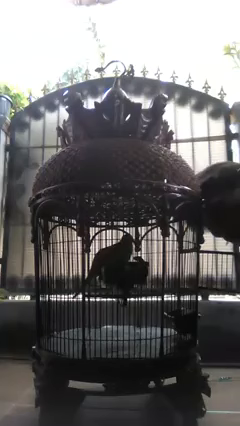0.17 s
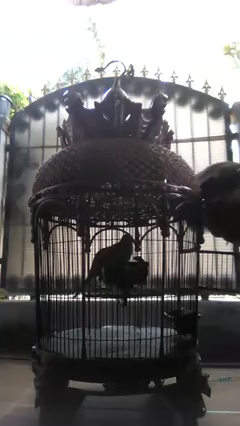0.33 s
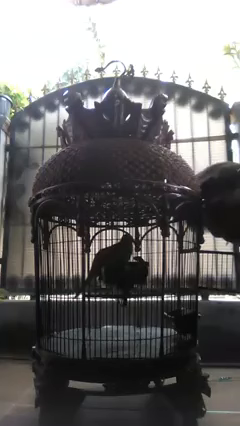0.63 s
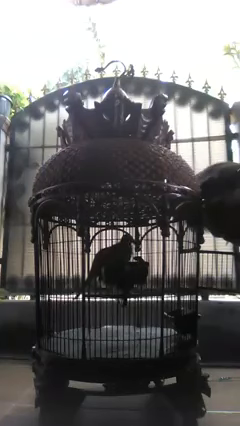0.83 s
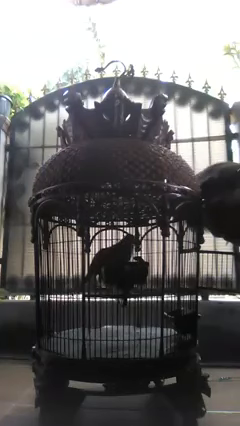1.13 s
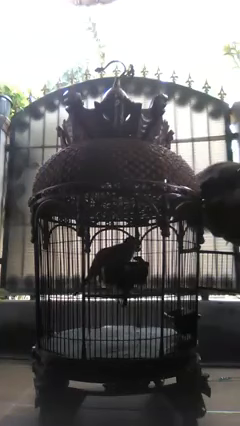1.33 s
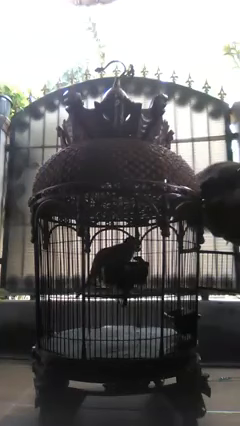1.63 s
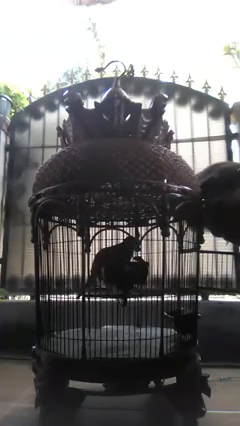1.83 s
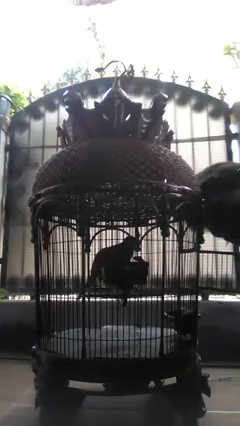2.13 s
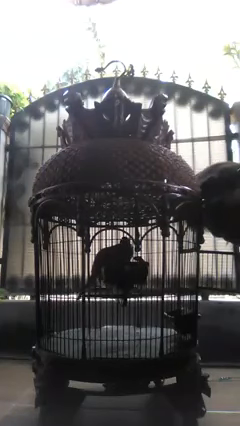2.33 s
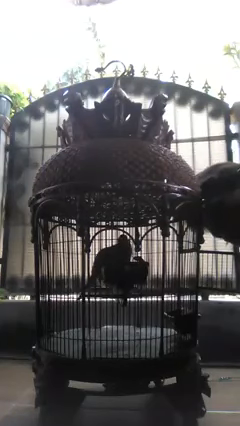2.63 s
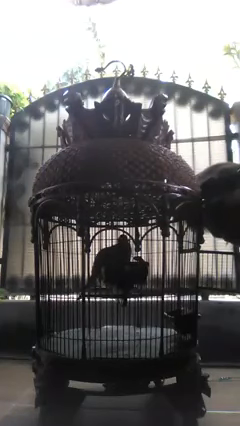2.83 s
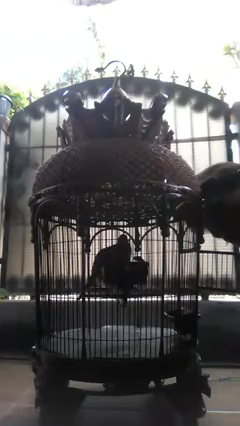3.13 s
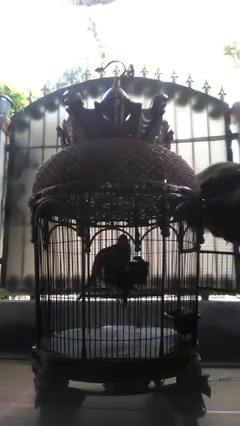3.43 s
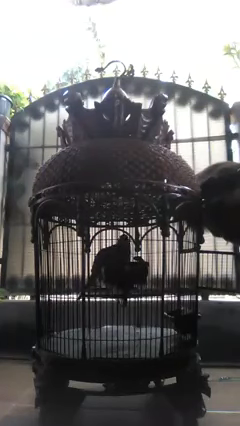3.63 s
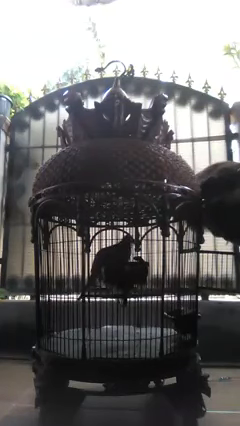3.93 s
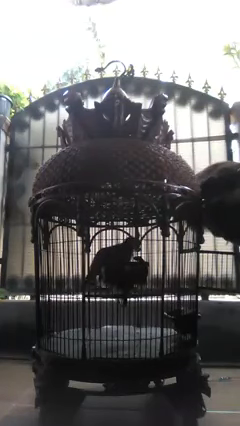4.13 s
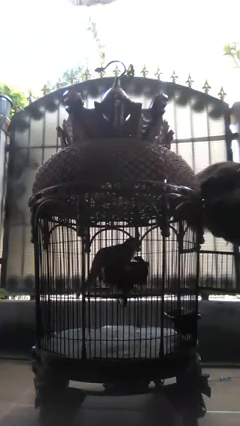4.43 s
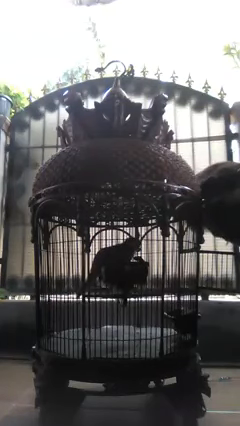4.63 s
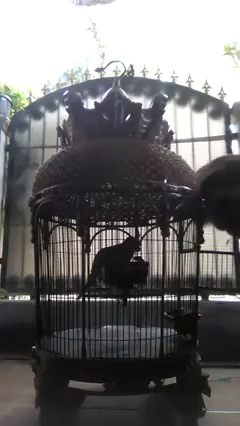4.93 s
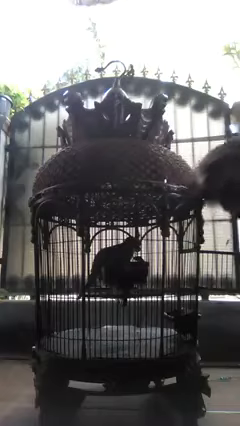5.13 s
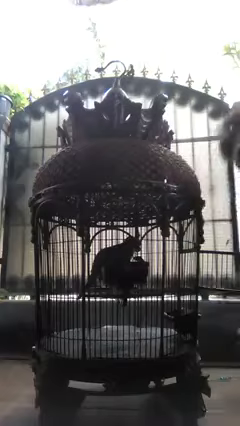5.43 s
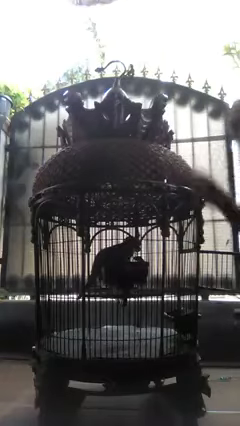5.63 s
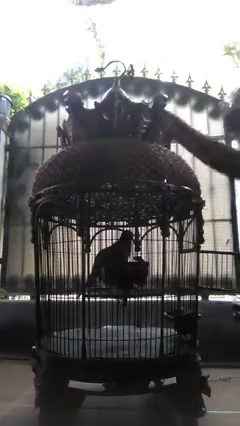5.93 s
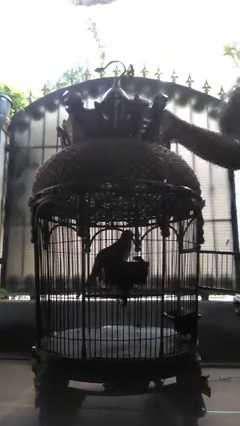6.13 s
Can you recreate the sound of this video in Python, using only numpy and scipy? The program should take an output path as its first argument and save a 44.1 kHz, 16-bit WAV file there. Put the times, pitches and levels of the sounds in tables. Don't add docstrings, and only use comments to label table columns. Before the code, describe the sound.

After over a second of quiet yard air, faint hollow taps and tiny chirps, a nearby caged dove clicks and rolls a fast run of scooped coos. A distant dove answers more softly. The caged dove repeats its phrase past four seconds, then a deeper, fainter dove replies while feet scrape lightly on grit. Walls echo everything; traffic rumbles low behind a phone-grade microphone with light hiss.

```python
import sys
import numpy as np
from scipy import signal
from scipy.fft import rfft, irfft, next_fast_len
from scipy.io import wavfile
from scipy.ndimage import uniform_filter1d, map_coordinates

SR = 44100
rng = np.random.default_rng(int(sys.argv[2]) if len(sys.argv) > 2 else 0)


def invert_db(level):
    return 10 ** (np.asarray(level, dtype=float) / 20)


def unload_wav(signal):
    wavfile.write(
        sys.argv[1],
        SR,
        np.round(np.clip(np.atleast_2d(signal).T, -1, 1) * 32767).astype(np.int16),
    )


N = 277168
T = np.arange(N) / SR


def along(points, hz):
    f, v = np.transpose(points)
    return np.interp(np.log(hz + 1), np.log(f + 1), v)


def wobble(knots_per_s):
    return map_coordinates(rng.standard_normal(int(N * knots_per_s / SR) + 4), [T * knots_per_s])


def coloured(points):
    m = next_fast_len(N)
    gain = invert_db(along(points, np.fft.rfftfreq(m, 1 / SR)))
    x = irfft(rfft(rng.standard_normal(m)) * gain, m)[:N]
    return x / np.std(x)


def add(track, s, sound):
    part = track[round(s * SR):][:len(sound)]
    part += sound[:len(part)]


# multiple of f0, level/dB
OVERTONES = [(1, -1.5), (2, -18.5), (3, -24), (4, -36), (5, -29.5), (6, -49), (7, -50)]
# f/Hz, level/dB
PUFF = [(400, -34.5), (1500, -12.5), (3000, -7), (3600, -6), (5000, -16.5), (6400, -8.5), (7000, -20),
        (9000, -27), (12000, -58)]


def dove(notes, crop, from_hz, bend, sag_share, drop_hz, bright_db, puff_db, push, push_late_s):
    muffle_db, scoop_db = 24, -7
    push_s, drop_s = 0.0034, 0.013
    out, air = np.zeros(N), np.zeros(N)
    for s, rise, length, top_hz, db in notes:
        t = np.arange(round((length + 0.019) * SR)) / SR
        scoop = np.clip(1 - t / max(rise, 1e-4), 0, 1) ** bend
        drop = np.clip((t - length) / drop_s, 0, 1)
        sag = np.clip((t - rise) / max(length - rise, 1e-3), 0, 1) ** 1.9
        hz = top_hz * (1 - sag_share * sag) - (top_hz - from_hz) * scoop - drop_hz * drop
        phase = 2 * np.pi * (np.cumsum(hz) / SR + rng.random())
        accent = 1 + push * np.exp(-((t - rise - push_late_s) / push_s) ** 2)
        buzz_db = bright_db - 18 * sag
        tone = np.zeros(len(t))
        for k, level in OVERTONES:
            partial_db = level + along(crop, k * hz)
            if k > 1:
                partial_db = partial_db + buzz_db
            if k > 2:
                partial_db = partial_db - muffle_db * scoop
            tone += invert_db(partial_db) * (accent if k == 1 else 1) * np.sin(k * phase)
        attack = np.clip(t / (.004 + 0.28 * rise), 0, 1)
        release = np.cos(np.pi / 2 * drop) ** 2
        add(out, s, invert_db(db + scoop_db * scoop) * attack * release * tone)
        add(air, s, invert_db(db + puff_db) * np.exp(-((t - 0.71 * rise) / 0.013) ** 2))
    return out + air * coloured(PUFF)


def scooped(notes):
    rise_s, rise_per_pause, longest_rise_s = .0165, .08, .04
    waits = np.diff([s for s, *_ in notes], prepend=0)
    return [(s, min(rise_s + rise_per_pause * wait, longest_rise_s), *rest)
            for (s, *rest), wait in zip(notes, waits)]


def with_rise(notes, rise_s):
    return [(s, rise_s, *rest) for s, *rest in notes]


# t/s, peak level/dB
BEAK = [
    (1.365, -44.5),
    (4.271, -45.5),
]


def beak():
    out, t = np.zeros(N), np.arange(SR // 10) / SR
    for s, db in BEAK:
        ring = np.sin(2 * np.pi * 1080 * t) * invert_db(-5.0 - 60 * t / 0.092)
        ring += np.sin(2 * np.pi * 1650 * t) * invert_db(-60 * t / 0.028)
        crack = uniform_filter1d(rng.standard_normal(len(t)), size=7)
        add(out, s, invert_db(db - 17.5) * (ring + invert_db(-2.5 - 60 * t / .012) * crack))
    return out


# t/s, length/s, top f/Hz, level/dB
CAGED = [(1.42, 0.071, 1210, -22), (1.494, 0.038, 1173, -23.5), (1.545, .06, 1196, -25.5),
         (1.61, .05, 1154, -23.5), (1.695, .07, 1165, -24.5), (1.806, .09, 1190, -24),
         (4.322, 0.045, 1235, -21), (4.394, 0.064, 1212, -24), (4.447, 0.059, 1205, -24.5),
         (4.517, 0.059, 1152, -24), (4.603, 0.044, 1177, -23.5), (4.723, 0.083, 1202, -22.5)]
# t/s, length/s, top f/Hz, level/dB
CLOSING = [
    (1.906, .04, 1158, -31),
    (1.95, 0.0044, 720, -43),
    (4.828, .04, 1142, -30),
    (4.865, 0.016, 675, -41),
]
# f/Hz, level/dB
CROP = [(300, -24), (600, -5), (900, -2.5), (1200, -2.5), (1700, 1), (2400, -10), (2900, -6), (3600, -2),
        (4200, 6.5), (4750, -2.5), (5300, -13), (6000, -1.5), (7000, -19)]


def caged_dove():
    coos = dove(scooped(CAGED), CROP, from_hz=420, bend=1.6, sag_share=.035, drop_hz=400,
                bright_db=0.1, puff_db=-33, push=2.2, push_late_s=0.0062)
    closing = dove(with_rise(CLOSING, .003), CROP, from_hz=360, bend=2.2, sag_share=.14, drop_hz=302,
                   bright_db=-6.5, puff_db=-36, push=3.0, push_late_s=0.026)
    return coos + closing + invert_db(15) * beak()


# t/s, rise/s, length/s, top f/Hz, level/dB
NEIGHBOUR = [
    (2.258, .037, 0.077, 1210, -36),
    (2.338, 0.0049, 0.033, 1209, -40),
    (2.383, 0.0035, .03, 1190, -40.5),
    (2.422, .02, 0.047, 1159, -41.5),
    (2.499, .02, .066, 1139, -45),
    (2.59, 0.02515, 0.074, 1159, -42),
    (2.738, .019, 0.06, 1193, -40),
    (2.825, 0.0059, 0.067, 1092, -54),
]
# f/Hz, level/dB
FAR_CROP = [(600, -58), (800, 5.5), (920, 4.5), (1050, 0), (1200, 0.5), (2400, -15.5), (6000, -36)]


def neighbour_dove():
    return dove(NEIGHBOUR, FAR_CROP, from_hz=880, bend=0.3175, sag_share=0.012, drop_hz=150,
                bright_db=-17, puff_db=-51.0, push=1.17, push_late_s=-.011)


# t/s, length/s, f/Hz, level/dB
DEEP = [(4.936, 0.047, 920, -44), (5.07, 0.048, 914, -57.5), (5.141, 0.016, 915, -47.5),
        (5.225, 0.029, 905, -43), (5.315, 0.0083, 900, -46), (5.341, 0.015, 900, -48),
        (5.383, 0.015, 905, -47), (5.424, 0.15, 900, -65), (6.074, 0.033, 905, -56.5),
        (6.129, 0.078, 945, -45.5), (6.204, 0.027, 950, -40.5), (6.242, 0.033, 945, -46)]


def deep_dove():
    return dove(with_rise(DEEP, 0.0073), FAR_CROP, from_hz=930, bend=1.06, sag_share=0.0083, drop_hz=60.4,
                bright_db=-19.0, puff_db=-53, push=0.23, push_late_s=0.007)


# t/s, level/dB
FALLING = [(0.701, -61.5), (1.24, -62.5), (2.067, -59.5), (2.531, -56.5), (3.368, -55), (3.828, -56),
           (4.68, -54.5), (5.158, -57), (6.058, -57)]
# t/s, level/dB
RISING = [
    (0.303, -64.5),
    (1.686, -58.5),
    (2.969, -57.5),
    (4.285, -56),
    (5.634, -55),
]
# t/s, from f/Hz, to f/Hz, level/dB
STRAY = [
    (3.34, 4115, 2560, -61),
    (3.802, 3870, 3470, -67),
]


def chirps():
    # length/s, from f/Hz, to f/Hz, curve (over 1 = slow at first)
    fall, rise = (.078, 4950, 3210, 1.25), (0.044, 3800, 5550, .85)
    stray_hz_per_s, waver_db = 18000, 1.2
    out, flutter = np.zeros((3, N)), wobble(300)
    calls = [(s, *fall, db) for s, db in FALLING]
    calls += [(s, *rise, db) for s, db in RISING]
    calls += [(s, (a - b) / stray_hz_per_s, a, b, 1, db) for s, a, b, db in STRAY]
    for k, (s, length, from_hz, to_hz, curve, db) in enumerate(calls):
        u = np.linspace(0, 1, round(length * SR))
        glide = u ** curve - .06 * np.sin(2 * np.pi * u)
        hz = from_hz + (to_hz * rng.normal(1, 0.017) - from_hz) * glide
        hz = hz + 85 * flutter[round(s * SR):][:len(u)]
        swell = np.sin(np.pi * u) ** 1.1
        add(out[k % len(out)], s, invert_db(db + 1.0) * swell * np.sin(2 * np.pi * np.cumsum(hz) / SR))
    return out * invert_db(waver_db * wobble(220))


# t/s, peak level/dB
TAPS = [(0.054, -53), (0.5715, -56.5), (1.0647, -53), (2.0655, -53), (2.58, -54.5), (3.0445, -55.5),
        (3.5681, -58), (4.055, -50.5), (5.5593, -52.5), (6.0786, -58.5)]
# f/Hz, level/dB, t60/s
HOLLOW = [
    (1678, -1, 0.062),
    (1920, 4.5, 0.027),
    (2050, -3, 0.057),
    (2157, -12, .05),
]


def taps():
    out, t = np.zeros(N), np.arange(SR // 4) / SR
    for s, db in TAPS:
        ring = np.zeros(len(t))
        for hz, level, t60 in HOLLOW:
            decay = invert_db(level + rng.normal(0, 0.37) - 60 * t / t60)
            ring += decay * np.sin(2 * np.pi * hz * rng.normal(1, 0.023) * t)
        add(out, s, invert_db(db - 10.5) * ring * (1 - np.exp(-t / .002)))
    return out


# t/s, f/Hz, level/dB
WHISTLE = [
    [(4.0, 2020, -75.5), (4.3, 2050, -83.5)],
    [(4.38, 1994, -61), (4.6, 2020, -60.5), (4.8, 2096, -60.5), (4.95, 2050, -59), (5.1, 2013, -59),
     (5.3, 2020, -74), (5.5, 2126, -74)],
    [(5.56, 2024, -58), (5.65, 1926, -60.5), (5.77, 1870, -72.5), (5.97, 1855, -80)],
]


def whistle():
    out = np.zeros(N)
    for rows in WHISTLE:
        s, hz, db = np.transpose(rows)
        edge = np.clip(np.minimum(T - s[0], s[-1] - T) / 0.028, 0, 1)
        phase = 2 * np.pi * np.cumsum(np.interp(T, s, hz) + 18 * wobble(40)) / SR
        out += edge * invert_db(np.interp(T, s, db) + 2.3 * wobble(45)) * np.sin(phase)
    return out


# t/s, fade t60/s, level/dB, low weight level/dB
SHUFFLES = [(0.208, 0.14, -58.5, -9), (0.448, 0.24, -70, 4), (2.76, .3, -62.5, -13), (3.337, .63, -66, -29),
            (3.601, 0.23, -71, -12.5), (3.94, .4, -66, -15), (5.012, 0.78, -57.5, 2.5),
            (5.041, 0.13, -73.5, 29.5), (5.101, 1, -68.5, -31), (5.381, 0.83, -69.5, -19),
            (5.578, .95, -69, 0.5), (5.679, 1, -70.5, -8.5), (5.852, .13, -60.5, 4.5)]
# f/Hz, level/dB
SCUFF = [(150, 1.5), (300, -17), (1000, 2), (2500, 2), (4200, 1.5), (5200, -22.5), (6500, -21.5),
         (16000, -48.5)]


def shuffles():
    scrape_rise_s = .026
    grit = coloured(SCUFF) * invert_db(1.5 * wobble(120))
    weight = coloured([(60, -18.5), (120, -24.0), (260, 4.5), (420, 2), (800, 0.0), (2000, -47), (4000, -120)])
    out, t = np.zeros(N), np.arange(SR // 2) / SR
    for s, t60, db, low_db in SHUFFLES:
        part = slice(round(s * SR), round(s * SR) + len(t))
        mix = grit[part] + invert_db(low_db + 0.5) * weight[part]
        envelope = invert_db(db - 60 * t / t60) * np.clip(t / scrape_rise_s, 0, 1) ** 2
        add(out, s, mix * envelope[:len(mix)])
    return out


# t/s, level/dB
TRAFFIC = [
    (0.0, -67),
    (0.09, -71.5),
    (1.28, -68.5),
    (1.82, -74.5),
    (2.52, -72),
    (4.93, -72),
    (5.0, -65.5),
    (5.27, -72),
    (6.28, -71),
]
# f/Hz, level/dB per Hz
RUMBLE = [(20, -46), (35, -11.5), (58, 3), (80, -4.5), (125, -5), (180, -12.5), (260, -34), (400, -120)]
# f/Hz, level/dB per Hz
TOWN = [(88, -28.5), (150, -1.5), (337, -7), (382, -8), (505, -9), (619, -11.5), (723, -9.5), (819, -12),
        (1330, -17), (1730, -16.5), (2150, -21.5), (2510, -18.5), (3710, -14.5), (5140, -25), (6200, -29),
        (8060, -62.5), (13600, -120)]


def town():
    rumble_db = np.interp(T, *np.transpose(TRAFFIC)) + 3 * wobble(8.3)
    air_db = -72.5 + 0.64 * wobble(0.5)
    return invert_db(rumble_db) * coloured(RUMBLE) + invert_db(air_db) * coloured(TOWN)


# f/Hz, t60/s
YARD = [(300, 0.54), (1200, 0.92), (2200, 0.69), (4000, 0.57), (8000, 0.39)]
# t/s, level/dB
WALLS = [(.0045, -4.5), (.011, -0.1), (0.019, -3.5), (.023, 4.5), (.032, -6.5), (.046, -8.5)]
# f/Hz, level/dB
ANSWER = [(300, -10.5), (650, -14), (900, 4.5), (1250, -1), (1500, -5), (2300, -4), (3600, -3.5),
          (5000, -12), (6000, -6), (9000, -19)]


def yard(x, wet_db, echo_db):
    build_s = 0.0082
    hz, t, z = signal.stft(rng.standard_normal(SR), SR, nperseg=256)
    decay = invert_db(-60 * t / along(YARD, hz)[:, None])
    tail = signal.istft(z * (1 - np.exp(-t / build_s)) * decay, SR, nperseg=256)[1]
    answer = invert_db(wet_db) * np.pad(tail / np.linalg.norm(tail), (round(.005 * SR), 0))
    for s, db in WALLS:
        answer[round(s * SR)] += invert_db(db + echo_db)
    m = next_fast_len(N + 2 * SR)
    colour = invert_db(along(ANSWER, np.fft.rfftfreq(m, 1 / SR)))
    return x + irfft(rfft(x, m) * rfft(answer, m) * colour, m)[:N]


def scene():
    doves = invert_db(-4.5) * yard(caged_dove(), wet_db=-6, echo_db=-7)
    doves += invert_db(-2.0) * yard(neighbour_dove(), wet_db=-8.5, echo_db=-11)
    doves += invert_db(-7.0) * yard(deep_dove(), wet_db=-0.5, echo_db=-7.0)
    bird = invert_db(-1.5) * sum(yard(echo_group, wet_db=12.0, echo_db=-4.5) for echo_group in chirps())
    tapping = yard(taps(), wet_db=12.5, echo_db=-2.5)
    far_bird = invert_db(-12.0) * yard(whistle(), wet_db=13, echo_db=-3.0)
    feet = yard(shuffles(), wet_db=-6.5, echo_db=-8.5)
    return (doves + bird + tapping + far_bird + feet + town())[None]


def top_cut(x):
    return signal.sosfilt(signal.butter(12, 15700, fs=SR, output="sos"), x)


# f/Hz, level/dB
SHIMMER = [(6500, -59), (7700, -53.5), (8700, -56), (9500, -42.5), (10300, -59), (11500, -34), (13000, -30),
           (15000, -44.5)]
# f/Hz, level/dB per Hz
HISS = [(4500, -60.5), (6300, -2.5), (7000, -3), (8800, -1.2), (9300, -5), (10500, -7), (11000, -0.2),
        (12500, -4.5), (14000, -6.5), (15500, -12), (16500, -64)]


def record(dry):
    shift_hz = 7500
    m = next_fast_len(N)
    shifted = dry * np.cos(2 * np.pi * shift_hz * T + .91 * wobble(570))
    colour = invert_db(6.5 + along(SHIMMER, np.fft.rfftfreq(m, 1 / SR)))
    shimmer = irfft(rfft(shifted, m) * colour, m)[:, :N]
    return top_cut(dry + shimmer + invert_db(-85.0) * coloured(HISS))


dry = scene()
out = record(dry)
unload_wav(out)
```